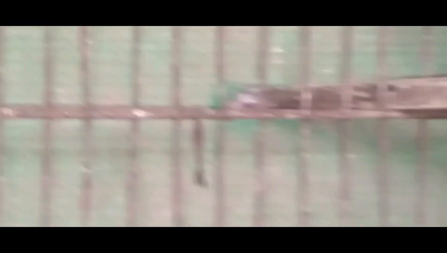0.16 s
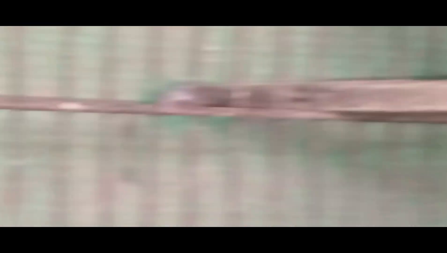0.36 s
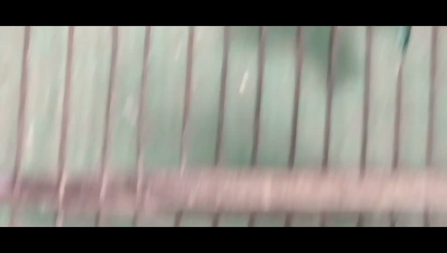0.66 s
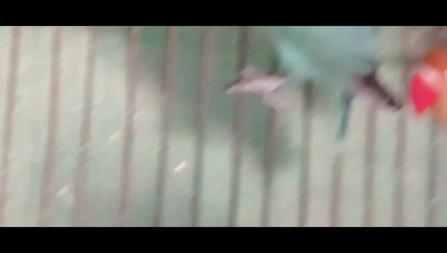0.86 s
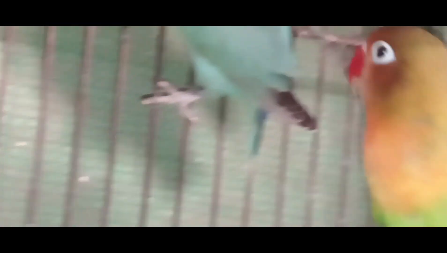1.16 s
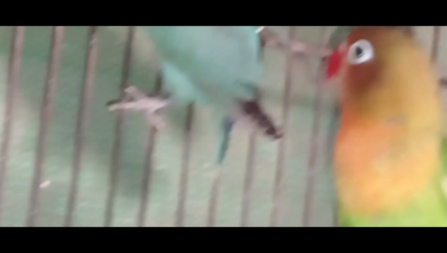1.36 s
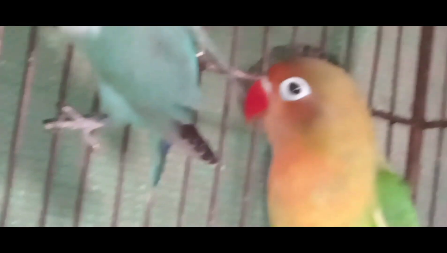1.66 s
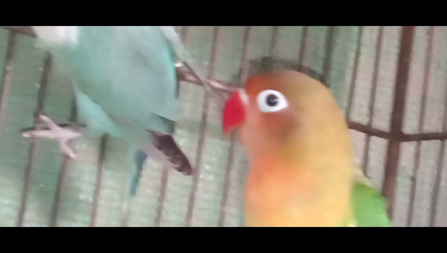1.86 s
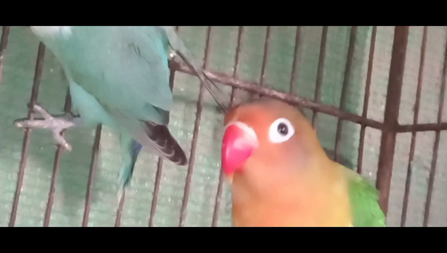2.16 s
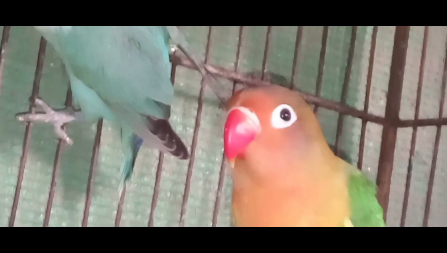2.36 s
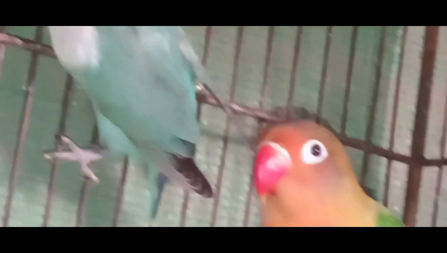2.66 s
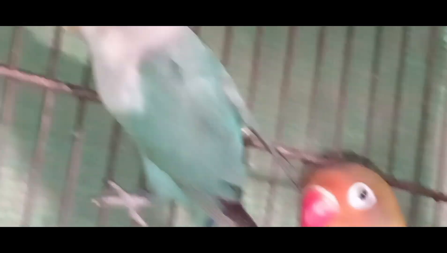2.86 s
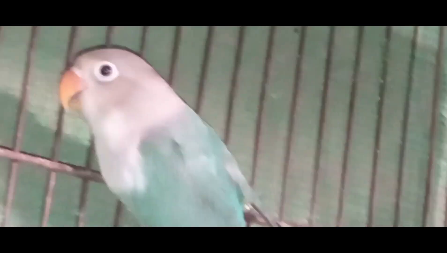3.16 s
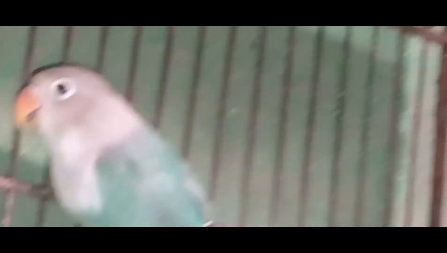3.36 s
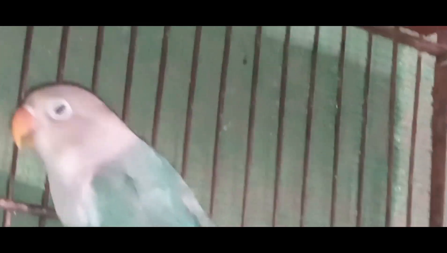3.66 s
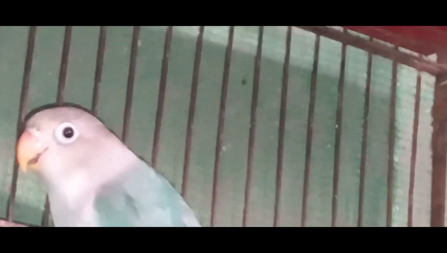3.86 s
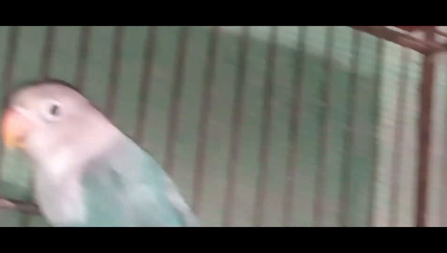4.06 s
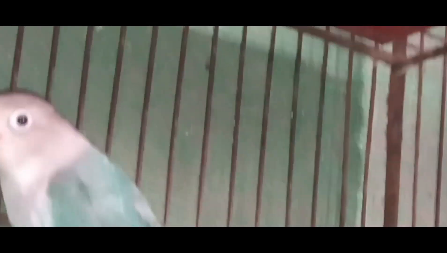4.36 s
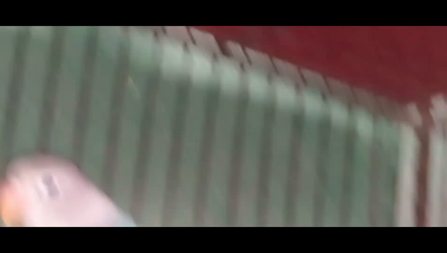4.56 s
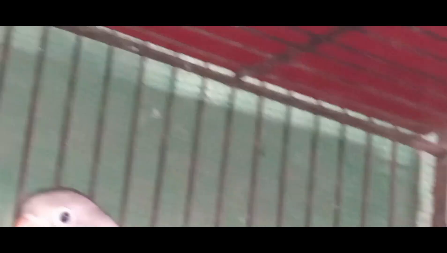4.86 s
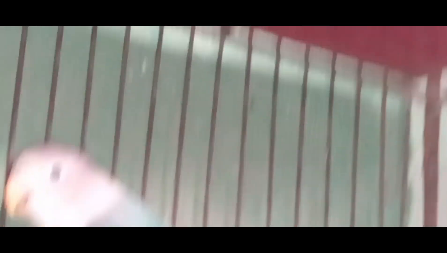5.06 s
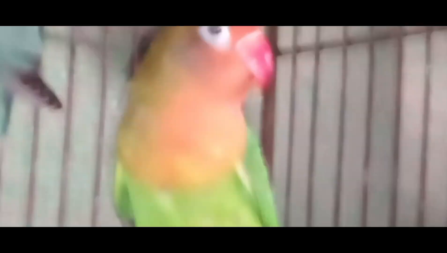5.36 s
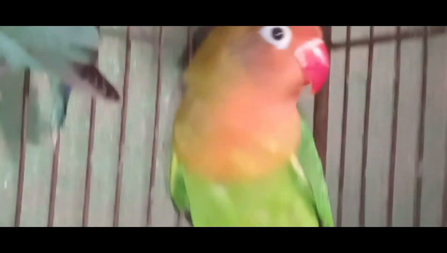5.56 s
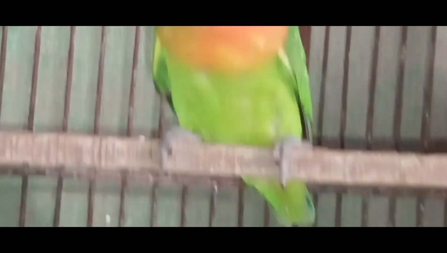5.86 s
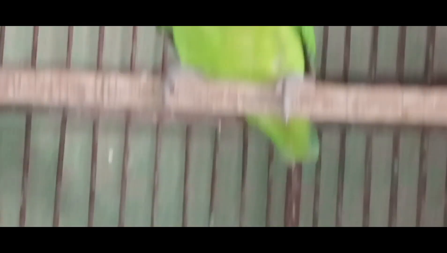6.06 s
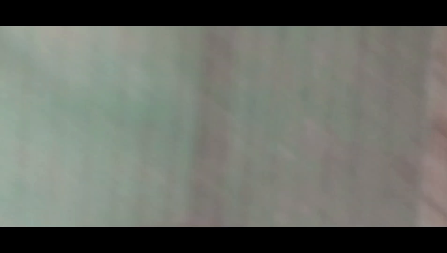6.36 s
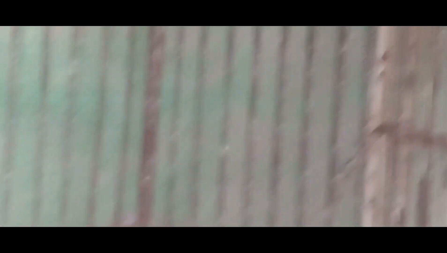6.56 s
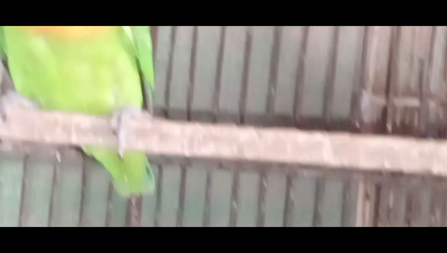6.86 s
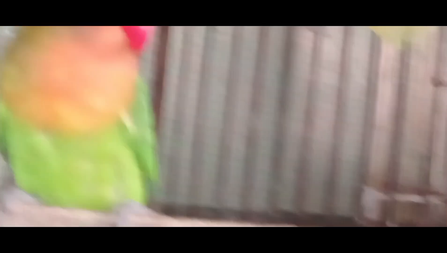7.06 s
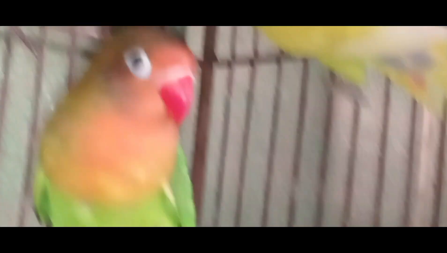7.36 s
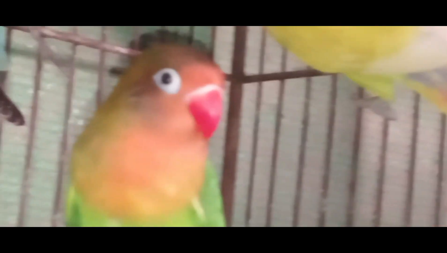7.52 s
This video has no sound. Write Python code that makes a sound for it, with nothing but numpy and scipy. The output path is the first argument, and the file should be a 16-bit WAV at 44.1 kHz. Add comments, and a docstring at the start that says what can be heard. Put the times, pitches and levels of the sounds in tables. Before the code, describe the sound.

Small caged parrots call in a short, bright echo above steady fans whose hum beats slowly. Distant downward whistles recur throughout; two hoarse-to-clear whistles come early, a faint high squeak in the middle, then a brief scolding rattle and a piercing close chirp that makes the level duck. Afterwards come another whistle, scattered peeps, claw taps, and low rubbing on the hand-held microphone.

```python
"""Lovebirds in a wire cage give four arched whistles, a sharp close chirp, a dry rattling call and small peeps.
Bird voices are tones with trembling pitch and overtones; the rattle is pulsed noise shaped by a throat.
A farther bird repeats a falling whistle. Short bursts of noise tap on the cage, and a faint squeak sounds.
Two fan motors are sine tones that beat slowly against each other, with noise for the moving air.
The hand-held camera is bumped and rubbed, and its gain control ducks when the treble gets loud."""
import sys
import numpy as np
from scipy import signal
from scipy.fft import rfft, irfft, next_fast_len
from scipy.io import wavfile
from scipy.ndimage import map_coordinates

SR = 44100
rng = np.random.default_rng(int(sys.argv[2]) if len(sys.argv) > 2 else 0)


def master(y):
    """Save y as 16-bit WAV."""
    cut = np.clip(np.atleast_2d(y).T, -1, 1)
    pcm = np.round(cut * 32767)  # scale
    wavfile.write(sys.argv[1], SR, pcm.astype(np.int16))


N = 339129
T = np.arange(N) / SR


def amp(db):
    """Decibels to gain."""
    return 10 ** (np.asarray(db) / 20)


def unit(x):
    """Scale to rms 1."""
    return x / np.sqrt(np.mean(x ** 2) + 1e-20)


def along(points, hz):
    """Read (Hz, value) points on a log axis."""
    f, v = np.transpose(points)
    return np.interp(np.log(hz + 1), np.log(f + 1), v)


def curves(rows, t):
    """Each column of a table at the times t, which the first column counts."""
    s, *cols = np.transpose(rows)
    return [np.interp(t, s, c) for c in cols]


def wobble(rate, t):
    """A smooth random curve with rate knots a second."""
    return map_coordinates(rng.standard_normal(8192), [(t - t[0]) * rate], mode="wrap")


def bell(x, centre, half_width):
    """A smooth hump of height 1 around the centre."""
    return np.exp(-((x - centre) / half_width) ** 2)


def filtered(x, response):
    """x through a frequency response."""
    m = next_fast_len(len(x) + 8192)
    hz = np.fft.rfftfreq(m, 1 / SR)
    return irfft(rfft(x, m) * response(hz), m)[:len(x)]


def noise(spectrum):
    """Noise of rms 1, coloured by (Hz, dB per Hz) points."""
    return unit(filtered(rng.standard_normal(N), lambda hz: amp(along(spectrum, hz))))


def resonance(f, centre, width):
    """Response of one damped resonance."""
    return 1j * f * width / (centre ** 2 - f ** 2 + 1j * f * width)


def add(track, s, sound):
    """Mix a sound into a track at time s."""
    part = track[max(round(s * SR), 0):][:len(sound)]
    part += sound[:len(part)]


def syrinx(t, hz, level_db, jitter, overtones, tremble_rate=1100):
    """A bird's voice organ: a tone with trembling pitch, (multiple, dB) overtones and soft ends."""
    phase = 2 * np.pi * np.cumsum(hz * (1 + jitter * wobble(tremble_rate, t))) / SR
    tone = np.sin(phase)
    for multiple, db in overtones:
        below_limit = multiple * hz < SR / 2
        tone = tone + amp(db) * np.sin(multiple * phase) * below_limit
    ends = np.clip(np.minimum(t - t[0], t[-1] - t) / 0.00087, 0, 1)
    return np.sqrt(2) * amp(level_db) * ends * tone


def room(x, wet_db):
    """The direct sound plus the hard walls' fading echo, at about the same power."""
    # How fast the walls swallow each pitch. Each row: pitch in Hz, time to fade by 60 dB in seconds.
    wall_fade = [(200, 0.11), (3000, 0.2), (7000, 0.17), (14000, 0.069)]
    hz, t, z = signal.stft(rng.standard_normal(SR // 2), SR, nperseg=256)
    fade = amp(-60 * t / along(wall_fade, hz)[:, None])
    tail = signal.istft(z * fade, SR, nperseg=256)[1]
    delayed = np.pad(tail / np.linalg.norm(tail), (130, 0))  # the echo waits 130 samples
    echo = signal.fftconvolve(x, delayed)[:N]
    return (x + amp(wet_db) * echo) / np.hypot(1, amp(wet_db))


def fans():
    """Two motors near twice the mains rate drift in and out of step; the blades stir and chop the air."""
    # Steady motor tones. Each row: pitch in Hz, middle level in dB.
    motor_lines = [(200.8, -79), (229.7, -55.5), (257, -53.5), (301, -53)]
    # Colour of the fan's air noise. Each row: pitch in Hz, relative strength in dB per Hz.
    air_colour = [(82, -26), (140, -3), (234, -2.5), (273, -4.5), (302, -1.5), (430, -7.5), (494, -5),
                  (556, -5), (601, -5.5), (857, -8), (2480, -10.5), (3610, -18), (9110, -20),
                  (13800, -36.5), (15500, -40)]
    # Colour of the low rumble. Each row: pitch in Hz, relative strength in dB per Hz.
    rumble_colour = [(10, -32), (33, -8), (46, -15), (70, -7.5), (130, -10), (200, -38), (600, -69)]
    # Colour of the blade hiss. Each row: pitch in Hz, relative strength in dB per Hz.
    swish_colour = [(1500, -20), (4000, -2), (7000, 0.5), (9500, 4), (12000, -8), (15500, -35)]
    # How the blade hiss comes and goes. Each row: time in seconds, level before chopping in dB.
    draught = [(0, -53.5), (.7, -49.5), (1.5, -54), (3, -58), (6, -56.5), (6.8, -51.5), (7.69, -46)]
    hum_hz, shaft_hz = 100.5, 24.2
    beat_s, cancel_s = 4, 2.1  # beat period; a moment when the motors oppose each other
    phase = 2 * np.pi * hum_hz * T
    lag = 2 * np.pi * (T - cancel_s) / beat_s
    hum = amp(-29) * np.sin(phase) - amp(-34.5) * np.sin(phase - lag)
    turn = np.sin(2 * np.pi * shaft_hz * T + 0.45 * wobble(2.1, T))
    hum += amp(-52) * turn * np.sin(phase)
    lines = np.zeros(N)
    for hz, db in motor_lines:
        level = np.sqrt(2) * amp(db + 3.9 * wobble(3.94, T))
        lines += level * np.sin(2 * np.pi * hz * T + 1.66 * wobble(6, T))
    air = amp(-38.0 + 0.91 * wobble(15, T)) * noise(air_colour)
    rumble = amp(-46.0) * noise(rumble_colour)
    swish = amp(curves(draught, T)[0] + 5.1 * turn) * noise(swish_colour)
    return hum + lines + air + rumble + swish


def falling_whistles():
    """A far bird flicks its pitch up, then lets it sink ever more slowly; the walls smear it."""
    # The far bird's calls. Each row: start in seconds, level in dB, top pitch in Hz, time stretch.
    fall_rows = [(0.734, -47, 6530, 1.05), (1.198, -46, 6960, 0.82), (1.565, -47, 6800, 0.75),
                 (1.958, -46.5, 6270, .85), (3.475, -38.5, 6900, 0.89), (3.906, -35.5, 6900, 0.74),
                 (4.269, -38.5, 6800, 0.83), (4.635, -37, 6780, 0.78), (5.099, -39.5, 6600, 0.92),
                 (5.519, -38, 6370, 0.65), (5.822, -41, 5630, 0.5), (6.868, -40, 6290, 0.92),
                 (7.314, -37.5, 6420, 0.79)]
    # times and rates before the stretch
    lead_s, glide_s, end_hz = .014, .103, 2193
    hold_s, fade_db_per_s = 0.12, 190
    out = np.zeros(N)
    for s, db, top_hz, stretch in fall_rows:
        t = np.arange(0, .24, 1 / (SR * stretch))
        lead = np.clip(1 - t / lead_s, 0, 1)
        sink = np.exp(-np.maximum(t - lead_s, 0) / glide_s)
        hz = (end_hz + (top_hz - end_hz) * sink) * (1 - 0.1666 * lead)
        fade_db = 3 * lead + fade_db_per_s * np.maximum(t - hold_s, 0)
        add(out, s, syrinx(t, hz, db - fade_db, 0.044, []))
    return room(out, wet_db=4)


def taps():
    """Beaks and claws tick on the wire and the perch: brief bursts of noise around one pitch."""
    # The ticks. Each row: start in seconds, level before dying away in dB, centre in Hz, width in Hz.
    tap_rows = [(1.696, -26.5, 11800, 5000), (6.154, -29, 2000, 2000), (6.221, -26, 1200, 900),
                (6.258, -22.5, 1940, 2380), (6.924, -32, 8500, 2500), (7.02, -30, 8400, 1500),
                (7.023, -23.5, 1490, 1500), (7.068, -30, 7900, 2500), (7.622, -28, 7000, 4010)]
    decay_s = 0.0024
    out, t = np.zeros(N), np.arange(SR // 20) / SR
    for s, db, hz, width_hz in tap_rows:
        ring = lambda f: resonance(f, hz, width_hz) / (1 + (f / 13000) ** 4)
        tick = unit(filtered(rng.standard_normal(len(t)), ring))
        add(out, s, amp(db) * tick * np.exp(-t / decay_s))
    return room(out, wet_db=-3.0)


def arched_whistles():
    """Each starts hoarse and low, leaps to a clear held top note and breaks downwards."""
    # The whistles. Each row: start, climb, hold and drop in seconds, first pitch and top pitch in Hz,
    # hoarse level and held level in dB, least roughness from 0 to 1, overtone lift in dB, echo in dB.
    whistle_rows = [(1.7, .072, .156, .028, 1730, 3053, -22, -15.5, 0.01, 0, -8),
                    (2.156, 0.091, 0.21, 0.018, 1730, 3070, -26, -25.5, 0.17, 1, -5),
                    (4.944, .09, .066, .055, 2030, 3046, -30, -20, .9, 4, -4),
                    (5.535, .076, .141, 0.011, 1726, 3044, -23.5, -23.5, 0.06, 7, -4.5)]
    # Their overtones before the colouring below. Each row: multiple of the pitch,
    # level in the hoarse low register in dB, level in the clear high one in dB.
    overtone_rows = [(2, -14, -30.5), (3, -25.5, -34), (4, -31, -38), (5, -43, -40)]
    # The held notes swell and fade. Each row: time in seconds, half width in seconds, gain in dB.
    swell_rows = [(1.778, 0.0052, -9), (1.786, 0.0034, 4), (1.806, 0.013, 3), (1.842, 0.0081, -6),
                  (1.905, 0.014, 3.5), (2.274, 0.0051, 14.5), (2.336, 0.014, 14.5), (2.394, .008, -27),
                  (2.443, 0.0058, 12.5), (5.66, 0.0034, 10), (5.689, 0.0048, -18), (5.7, .011, 13.5),
                  (5.749, 0.01, 6.5)]
    clear_hz, end_hz = 2920, 1972  # pitch where the voice clears, and after the drop
    # the climb lingers on these pitches, over this share of its time, then leaps
    shelf_hz, shelf_span = (2070, 2378), (.36, .78)
    crest_shape = 0.88  # the held note is a shallow arch
    attack_s, drop_db = 0.0017, 7  # drop_db: loss over the drop
    # a throat resonance that the climbing note passes
    formant_hz, formant_width_hz, formant_db = 2090, 65, 2
    thin_hz, thin_db_per_hz = 2030, 0.2  # below this pitch the throat swallows the fundamental
    swell_share, flicker_db = 0.79, 3  # the overtones' share in the swells; their own flicker
    hoarse_jitter = .038
    out = np.zeros(N)
    for (s, climb, hold, drop, first_hz, top_hz, hoarse_db, held_db,
         least, lift_db, echo_db) in whistle_rows:
        clear, hoarse = np.zeros(N), np.zeros(N)
        t = np.arange(0, climb + hold + drop, 1 / SR)
        up, over, down = np.clip([t / climb, (t - climb) / hold, (t - climb - hold) / drop], 0, 1)
        rise_hz = np.interp(up, [0, *shelf_span, 1], [first_hz, *shelf_hz, clear_hz])
        arch_hz = (top_hz - clear_hz) * abs(np.sin(np.pi * over)) ** crest_shape
        hz = rise_hz + arch_hz + (end_hz - clear_hz) * down

        low_register = np.clip((clear_hz - hz) / 400, 0, 1)
        rough = np.clip(low_register, least, 1)
        register_db = held_db + low_register * (hoarse_db - held_db)
        effort_db = register_db + 2 * rough * wobble(119.5, t) - drop_db * down
        swell_db = sum(gain_db * bell(s + t, at, width) for at, width, gain_db in swell_rows)
        formant_gain_db = formant_db * bell(hz, formant_hz, formant_width_hz)
        throat_db = formant_gain_db - thin_db_per_hz * np.maximum(thin_hz - hz, 0)

        # the overtones escape that throat shaping, take most of each swell and die early in the drop
        colour_db = lift_db - throat_db - (1 - swell_share) * swell_db - 7 * np.sqrt(down)
        overtones = []
        for multiple, low_db, high_db in overtone_rows:
            voice_db = high_db + rough * (low_db - high_db)
            overtones.append((round(multiple), colour_db + voice_db + flicker_db * wobble(75, t)))
        level_db = effort_db + swell_db + throat_db
        jitter = 0.0019 + hoarse_jitter * rough
        note = syrinx(t, hz, level_db, jitter, overtones, tremble_rate=700)
        note = note * (1 - np.exp(-t / attack_s))
        add(clear, s, note * (1 - rough))
        add(hoarse, s, note * rough)
        out += room(clear, wet_db=echo_db) + room(hoarse, wet_db=echo_db + 3)
    return out


def squeak():
    """A faint, very high tone that swells, sags a little in pitch and fades."""
    start_s, length_s, start_hz, sag_hz_per_s = 3.08, .4, 15200, 1300
    out, t = np.zeros(N), np.arange(0, length_s, 1 / SR)
    tone = syrinx(t, start_hz - sag_hz_per_s * t, -59, .009, [])
    add(out, start_s, tone * np.sqrt(abs(np.sin(np.pi * t / length_s))))
    return out


def twitter(count):
    """Rows of faint peeps, loosely spaced, at random pitches."""
    when, pitch, strength = rng.random((count, 3)).T
    times = np.interp(np.arange(count) + when, [0, count], [6.1, 6.8])  # seconds
    pitches = np.interp(pitch, [0, 1], [2105, 3870])  # Hz
    levels = -42 + 6 * (strength - .5)  # dB
    return [(s, .025, hz, db) for s, hz, db in zip(times, pitches, levels)]


def peeps():
    """Short soft contact notes, each a tone with one overtone that swells and fades."""
    # The clearest peeps. Each row: start in seconds, length in seconds, pitch in Hz, peak level in dB.
    peep_rows = [(3.503, .022, 3300, -35.5), (3.712, 0.02, 3390, -32), (3.755, .05, 3520, -42.5),
                 (4.876, 0.044, 3580, -40), (6.04, 0.018, 3040, -31.5), (6.186, 0.03, 3130, -39),
                 (6.27, .03, 3700, -44), (6.339, 0.011, 2850, -34.5), (6.479, .015, 2350, -35),
                 (6.528, .035, 3430, -43), (6.715, .018, 3870, -38.5)]
    out = np.zeros(N)
    for s, length, hz, db in peep_rows + twitter(count=5):
        t = np.arange(0, length, 1 / SR)
        add(out, s, np.hanning(len(t)) * syrinx(t, hz, db, 0.058, [(2.7, -18)]))
    return room(out, wet_db=-4)


def rattle(count=9):
    """A scolding rasp: an even train of noisy pulses swells and fades, coloured by the throat."""
    # The throat's resonances. Each row: pitch in Hz, width in Hz, strength in dB.
    throat_rows = [(2220, 580, -4), (3180, 180, 3), (4400, 450, -2.5), (5100, 450, -2), (7280, 320, 2.5),
                   (8100, 480, -5), (9530, 500, 0)]
    first_s, rate_hz = 4.489, 50.6  # first pulse, pulses a second
    middle_db, edge_db = -17.5, -4.5  # middle pulse before the puff's shape; ends against middle
    attack_s, decay_s = 0.0018, 0.006  # one pulse
    puffs, t = np.zeros(N), np.arange(SR // 20) / SR
    puff = (1 - np.exp(-t / attack_s)) * np.exp(-t / decay_s)
    for k, from_middle in enumerate(np.linspace(-1, 1, count)):
        level_db = middle_db + edge_db * abs(from_middle) ** 3
        add(puffs, first_s + k / rate_hz, amp(level_db) * puff)

    def throat(f):
        """The resonances' powers added, with the highest treble cut."""
        power = sum(abs(amp(db) * resonance(f, hz, width)) ** 2 for hz, width, db in throat_rows)
        return np.sqrt(power) / (1 + (f / 11000) ** 16)

    voice = unit(filtered(rng.standard_normal(N), throat))
    return room(puffs * voice, wet_db=0)


def close_chirp():
    """Harsh, noisy catches jump to a thin clear note that dies away."""
    # The catches that open it. Each row: middle in seconds, half width in seconds, pitch in Hz, level in dB.
    catch_rows = [(5.029, 0.0031, 5720, -10), (5.0403, 0.0038, 5150, -11), (5.0432, 0.0015, 5610, 2)]
    # Colour of the breathy edge. Each row: pitch in Hz, relative strength in dB per Hz.
    rasp_colour = [(2500, -21), (5200, 11), (7000, -13), (8400, 3), (9800, -6), (11300, 11), (15500, -34.5)]
    note_s, note_hz, note_db = 5.045, 6510, -2  # the clear note, before its attack and fade
    attack_s, fade_db_per_s = .003, 480
    out, t = np.zeros(N), np.arange(0, .1, 1 / SR)
    for s, half_width, hz, db in catch_rows:
        # a catch doubles its period: a tone halfway between the harmonics
        tone = syrinx(t, hz, db, .04, [(3 / 2, -17), (2, -17)], tremble_rate=2600)
        rasp = amp(db - 13.0) * noise(rasp_colour)[:len(t)]
        add(out, s - t.mean(), (tone + rasp) * bell(t, t.mean(), half_width))
    db = note_db - fade_db_per_s * t
    wavering_hz = note_hz * (1 + 0.0115 * wobble(92, t))
    note = syrinx(t, wavering_hz, db, 0.012, [(2, -19)], tremble_rate=5200)
    breath = amp(db - 27.0) * noise(rasp_colour)[:len(t)]
    add(out, note_s, (note + breath) * (1 - np.exp(-t / attack_s)))
    return room(out, wet_db=-13)


def handling():
    """One dull bump rings the camera body with a faint click; later, noise rumbles as the grip shifts."""
    # The body's dull knock. Each row: middle in seconds, peak level in dB, pitch in Hz, decay in seconds.
    bump_rows = [(5.1475, -9, 287, 0.0014), (5.1472, -15, 780, 0.00055)]
    # The camera rubs in the hand. Each row: middle in seconds, peak level in dB, decay in seconds.
    rub_rows = [(7.421, -25, 0.019), (7.545, -24.5, 0.027), (7.68, -32, .04)]
    # Colour of the rubbing. Each row: pitch in Hz, relative strength in dB per Hz.
    grip_colour = [(20, -27), (50, -7), (130, -5.5), (250, -15), (500, -33), (2000, -76)]
    # knock and rubs rise as fast as they decay
    bump = np.zeros(N)
    for s, db, hz, decay in bump_rows:
        bump += amp(db) * np.cos(2 * np.pi * hz * (T - s)) * np.exp(-abs(T - s) / decay)
    click_shape = np.exp(-abs(T - bump_rows[0][0]) / .0015)
    click = amp(-40) * click_shape * noise([(300, -7), (1500, -2), (15000, -24)])
    grip = sum(amp(db) * np.exp(-abs(T - s) / decay) for s, db, decay in rub_rows)
    return bump + click + grip * noise(grip_colour)


def scene():
    """All the birds over the fans, with the taps, the squeak and the handling."""
    birds = falling_whistles() + arched_whistles() + peeps() + rattle() + close_chirp()
    return (fans() + birds + taps() + squeak() + handling())[None]


def record(dry):
    """Gain control that listens mostly to the treble clamps fast and recovers steadily; then the band limit."""
    x = dry[0]
    threshold_db, release_db_per_s, top_hz = -17.5, 210, 15500
    keep = np.exp(-1 / (.0017 * SR))  # smoothing over 1.7 ms
    follow = lambda v: signal.lfilter([1 - keep], [1, -keep], v)
    steps = np.diff(x, prepend=0)  # sample-to-sample steps favour the treble
    treble = follow(abs(signal.hilbert(steps, next_fast_len(N))[:N]))
    over = np.maximum(20 * np.log10(treble + 1e-9) - threshold_db, 0)
    # hold each peak, sinking at the release rate
    held = np.maximum.accumulate(over + release_db_per_s * T) - release_db_per_s * T
    return filtered(x * amp(-follow(held)), lambda hz: hz < top_hz)[None]


dry = scene()
out = record(dry)
master(out)
```